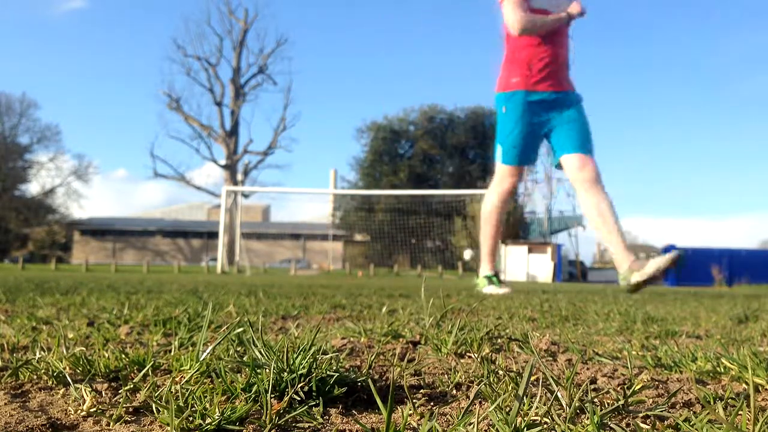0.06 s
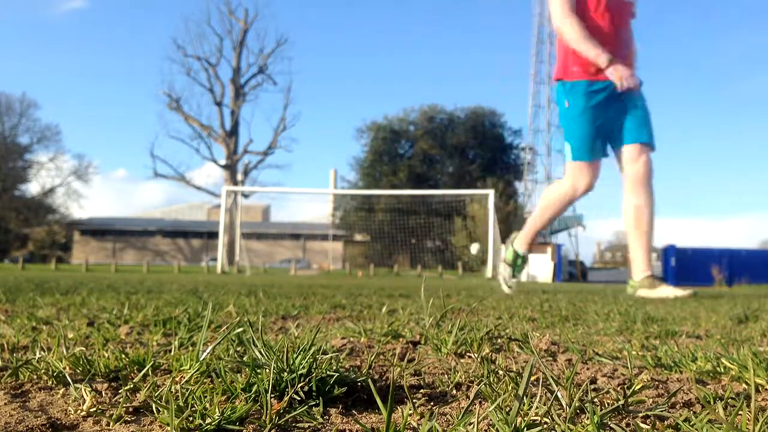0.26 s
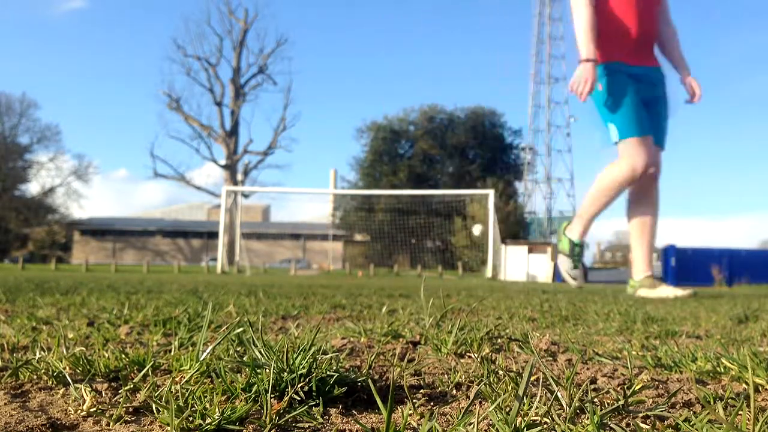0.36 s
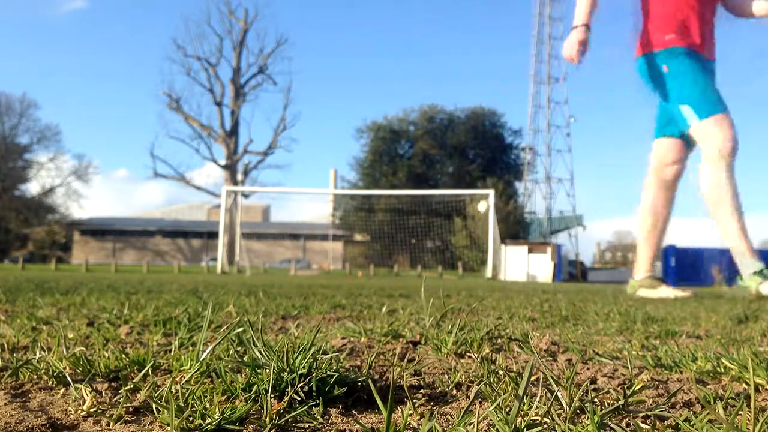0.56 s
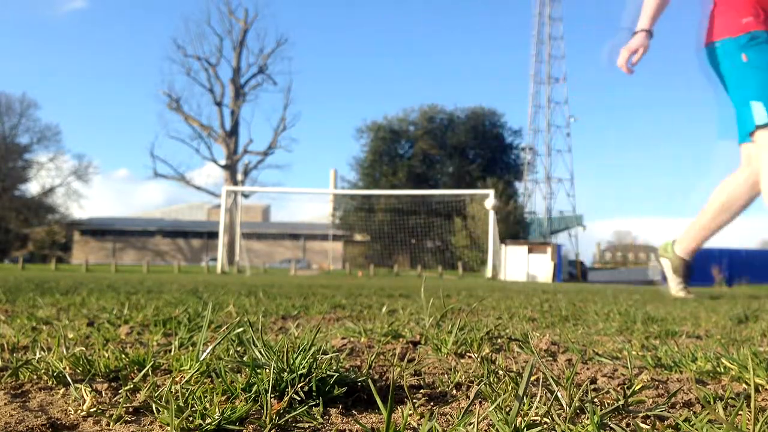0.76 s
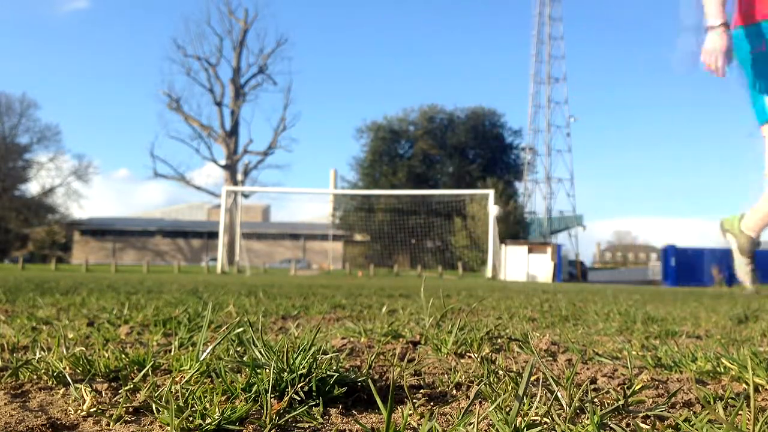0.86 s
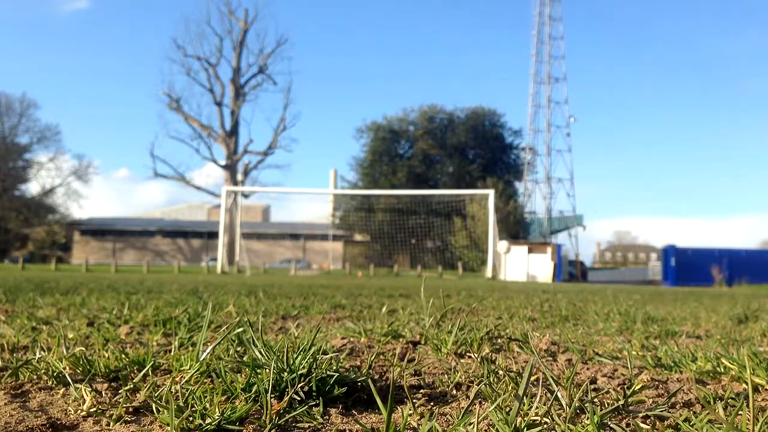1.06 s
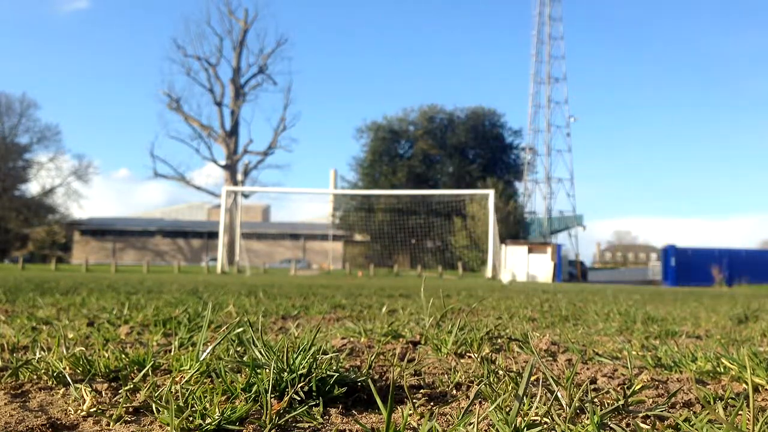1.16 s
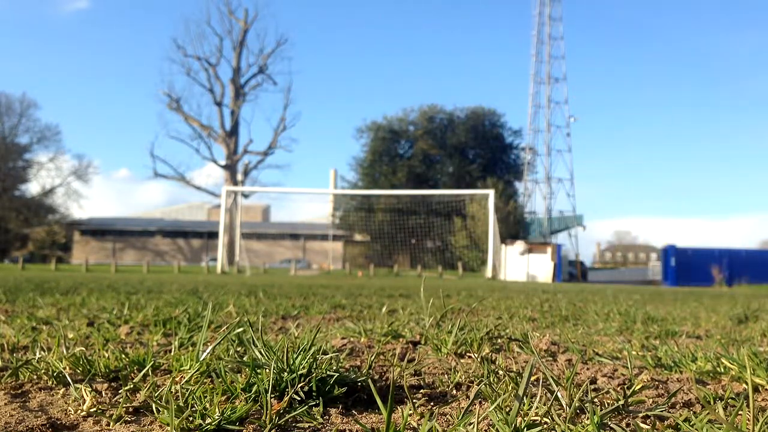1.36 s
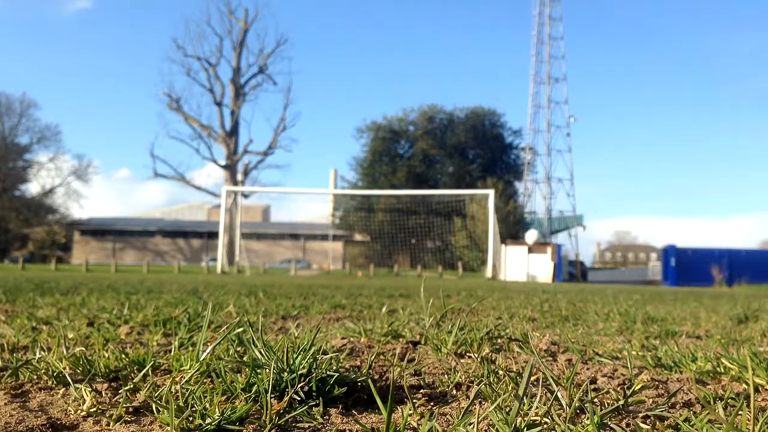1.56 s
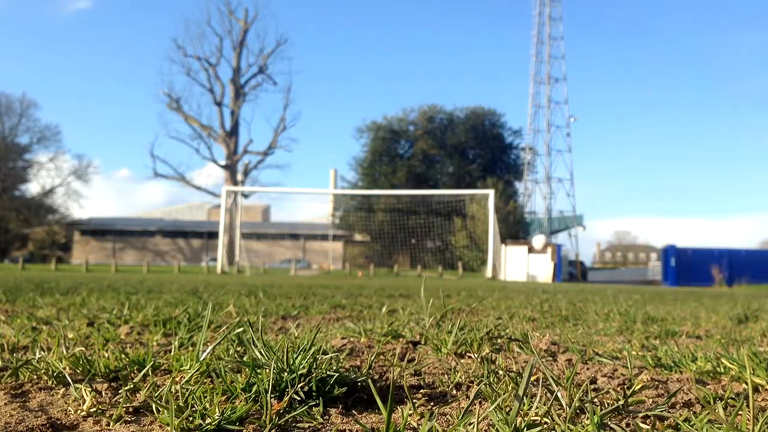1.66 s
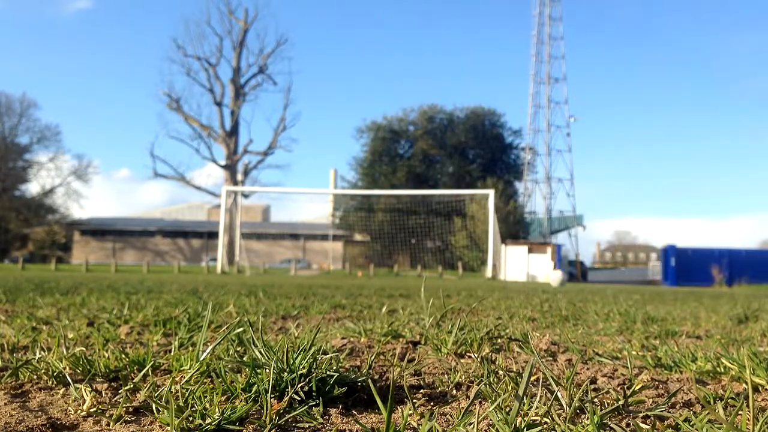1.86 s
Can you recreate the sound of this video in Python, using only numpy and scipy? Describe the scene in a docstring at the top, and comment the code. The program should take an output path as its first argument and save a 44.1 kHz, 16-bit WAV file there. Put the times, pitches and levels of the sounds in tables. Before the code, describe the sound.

A football thumps dully on an open grass pitch, then again more softly a second later

```python
"""An open grass pitch by a goal: light wind and distant rumble as swelling noise, under steady microphone hiss.
Soft footfalls thud on the turf; among them a football thumps down, then again about a second later.
Each bounce squashes the ball for about 14 ms: a low push of air, with damped ringing at landing and lift-off.
Last come two light knocks on something hard. Ball and knocks leave a faint, late scatter in the open air."""
import sys
import numpy as np
from scipy import signal
from scipy.fft import rfft, irfft, next_fast_len
from scipy.io import wavfile
from scipy.ndimage import uniform_filter1d

SR = 44100
rng = np.random.default_rng(int(sys.argv[2]) if len(sys.argv) > 2 else 0)


def master_out(mix):
    """Clip the mix to full scale and print it as 16-bit PCM to the path in sys.argv[1]."""
    frames = np.transpose(np.atleast_2d(mix))
    ceiling = np.clip(frames, -1, 1)
    pcm = np.round(ceiling * 32767).astype(np.int16)
    wavfile.write(sys.argv[1], SR, pcm)


N = 83790  # samples, 1.9 s

# outdoor air, its relative noise spectrum: pitch_hz [Hz], level_db [dB per Hz]
AIR_SPECTRUM = [(20, -29), (35, -12), (60, -4), (100, -2), (160, 1.5), (230, -5.5), (320, -10.5),
                (430, -15.5), (620, -15), (1000, -21.5), (1400, -26), (1900, -30.5), (2400, -35.5),
                (3000, -48), (5000, -53)]
# slow swell of the outdoor air: time_s [s], relative level_db [dB]
AIR_SWELL = [(0, 2), (.15, 2.5), (.35, 2), (.6, 1), (.87, 1), (1.05, 1.5), (1.2, 1.5), (1.5, 3.2), (1.7, 2),
             (1.9, 1)]
# microphone hiss, its relative noise spectrum: pitch_hz [Hz], level_db [dB per Hz]
HISS_SPECTRUM = [(1000, -3), (2800, 5), (4000, 6), (6000, 3.5), (9000, 2.5), (15000, 1.5)]
# soft footfalls on the turf: start_s [s], gain_db [dB]
FOOTFALLS = [(0.131, -35), (.520, -35), (0.939, -34)]
# light knocks on something hard: start_s [s], ring_gain_db [dB], thud_gain_db [dB]
KNOCKS = [(1.408, -42, -35.5), (1.791, -49.5, -53)]
# what a knock rings with: pitch_hz [Hz], relative level_db [dB], t60_s [s]
KNOCK_MODES = [(510, -15, 0.014), (780, 8.5, 0.01), (1426, 1.5, 0.024), (1670, 0, 0.014), (1884, -2, 0.018),
               (2170, -6, 0.0077)]
# ball bounces: start_s [s], contact_s [s], thump_gain_db [dB], landing_gain_db [dB],
# landing_attack_s [s], lift_off_gain_db [dB], lift_off_top_hz [Hz]
BOUNCES = [(0.2238, .0140, -10.5, -20.5, 0.00055, -21, 1210),
           (1.2568, .0141, -21, -24.5, 0.00069, -20.5, 850)]
# ringing skin and enclosed air of the ball: pitch_hz [Hz], relative level_db [dB], t60_s [s]
BALL_MODES = [(427, -13.5, 0.03), (597, -5, 0.015), (827, 5.5, 0.009), (1015, 0.5, 0.013),
              (1148, -4, 0.018), (1500, -8, 0.011), (1820, -10, 0.014), (2030, -20.5, 0.025)]

AIR_RMS_DB, RUMBLE_TOP_HZ = -43.5, 206
GUST_DB, BASS_FLUTTER_DB, MID_FLUTTER_DB = 0.3, 2, 0.45  # standard deviations of the level
HISS_RMS_DB, MICROPHONE_TOP_HZ = -65.5, 15250
SCATTER_DB, SCATTER_T60_S, SCATTER_DELAY_S, SCATTER_LOW_HZ = -23, 0.23, 0.0099, 147
STEP_CONTACT_S = 0.013
KNOCK_CONTACT_S, KNOCK_ATTACK_S, KNOCK_TOP_HZ = 0.0106, 0.00024, 2500
SQUASH_POWER, SQUASH_SKEW = 2.43, 0.29  # how peaked the flattening is; how much faster it flattens than springs back
THUMP_LOW_HZ, THUMP_TOP_HZ, THUMP_LOW_DB = 85, 670, -8  # the deepest part is shelved down
LANDING_TOP_HZ = 1850
LIFT_SHARE, LIFT_ATTACK_S = 0.85, 0.0016  # lift-off starts at this share of the contact and swells in


def undb(db):
    """Decibels to gain."""
    return 10 ** (np.asarray(db) / 20)


def level(x, db):
    """Set the rms level in dB."""
    return x * undb(db) / np.sqrt(np.mean(x ** 2))


def shape(x, gain):
    """Filter by a gain that is a function of frequency."""
    size = 2 * next_fast_len(len(x))
    hz = np.arange(size // 2 + 1) * SR / size
    spectrum = rfft(x, size) * gain(np.maximum(hz, 1))
    return irfft(spectrum, size)[:len(x)]


def lowpass(x, hz, order):
    """Smooth low-pass without delay."""
    return shape(x, lambda f: 1 / np.sqrt(1 + (f / hz) ** (2 * order)))


def coloured(points):
    """Noise with a spectrum of (Hz, dB) points."""
    hz, db = np.array(points).T
    return shape(rng.standard_normal(N), lambda f: undb(np.interp(np.log(f), np.log(hz), db)))


def walk(rate_hz):
    """Slow random wander with a standard deviation of 1."""
    k = int(SR / rate_hz)
    steps = np.repeat(rng.standard_normal(N // k + 1), k)
    wander = uniform_filter1d(uniform_filter1d(steps, k), k)[:N]
    return wander / wander.std()


def since(start_s):
    """Seconds since a moment, zero before it."""
    return np.maximum(np.arange(N) / SR - start_s, 0)


def ring(start_s, modes, attack_s):
    """Modes set off at one moment, each a sine dying away by 60 dB in its t60."""
    t = since(start_s)
    tone = np.zeros(N)
    for pitch_hz, level_db, t60_s in modes:
        decay = np.exp(-np.log(1000) * t / t60_s)
        tone += undb(level_db) * decay * np.sin(2 * np.pi * pitch_hz * t)
    return tone * (1 - np.exp(-t / attack_s))


def squash(start_s, contact_s):
    """Air pushed by a soft contact: acceleration of a volume that flattens fast and springs back slower."""
    u = np.minimum(since(start_s) / contact_s, 1)
    skewed = u + SQUASH_SKEW * u * (1 - u)
    volume = np.abs(np.sin(np.pi * skewed)) ** SQUASH_POWER
    push = np.gradient(np.gradient(volume))
    push = lowpass(push / np.abs(push).max(), THUMP_TOP_HZ, order=2)
    deepest = lowpass(push, THUMP_LOW_HZ, order=4)
    return push - (1 - undb(THUMP_LOW_DB)) * deepest


def outdoor_air():
    """Distant rumble and light wind: all of it swells slowly, while bass and the rest flutter on their own."""
    noise = coloured(AIR_SPECTRUM)
    bass = lowpass(noise, RUMBLE_TOP_HZ, order=4)
    swell_db = np.interp(since(0), *np.array(AIR_SWELL).T) + GUST_DB * walk(6.3)
    rumble = bass * undb(BASS_FLUTTER_DB * walk(14.15))
    wind = (noise - bass) * undb(MID_FLUTTER_DB * walk(9.15))
    return level((rumble + wind) * undb(swell_db), AIR_RMS_DB)


def surroundings(x):
    """Scatter in the open air: a faint decaying noise tail, a little late and thin in the bass."""
    t = since(SCATTER_DELAY_S)
    tail = rng.standard_normal(N) * (t > 0) * np.exp(-np.log(1000) * t / SCATTER_T60_S)
    tail /= np.linalg.norm(tail)
    without_bass = x - lowpass(x, SCATTER_LOW_HZ, order=2)
    return undb(SCATTER_DB) * signal.fftconvolve(without_bass, tail)[:N]


def footfalls():
    """The player's steps on the turf: each soft contact pushes out a faint low thud."""
    return sum(undb(gain_db) * squash(start_s, STEP_CONTACT_S) for start_s, gain_db in FOOTFALLS)


def knocks():
    """Light contacts with a hard surface: a quickly damped ring over a faint thud."""
    out = np.zeros(N)
    for start_s, ring_gain_db, thud_gain_db in KNOCKS:
        ringing = lowpass(ring(start_s, KNOCK_MODES, KNOCK_ATTACK_S), KNOCK_TOP_HZ, order=8)
        thud = squash(start_s, KNOCK_CONTACT_S)
        out += undb(ring_gain_db) * ringing + undb(thud_gain_db) * thud
    return out


def bounces():
    """Ball on grass: a thump over each contact, a ring on landing and a duller, slower one on lift-off."""
    out = np.zeros(N)
    for start_s, contact_s, thump_db, landing_db, attack_s, lift_db, lift_top_hz in BOUNCES:
        thump = squash(start_s, contact_s)
        landing = lowpass(ring(start_s, BALL_MODES, attack_s), LANDING_TOP_HZ, order=8)
        lift_s = start_s + LIFT_SHARE * contact_s
        lift_off = lowpass(ring(lift_s, BALL_MODES, LIFT_ATTACK_S), lift_top_hz, order=4)
        out += undb(thump_db) * thump + undb(landing_db) * landing + undb(lift_db) * lift_off
    return out


def scene():
    """The open air, the player's steps and the ball with its scatter, in mono."""
    ball = bounces() + knocks()
    return (outdoor_air() + footfalls() + surroundings(ball) + ball)[None]


def record(dry):
    """The microphone in the grass adds its hiss, and a steep low-pass cuts the top."""
    hiss = level(coloured(HISS_SPECTRUM), HISS_RMS_DB)
    # order 10, 0.2 dB ripple, 70 dB stopband
    top_cut = signal.ellip(10, .2, 70, MICROPHONE_TOP_HZ, fs=SR, output="sos")
    return signal.sosfilt(top_cut, dry + hiss)


dry = scene()
out = record(dry)
master_out(out)
```